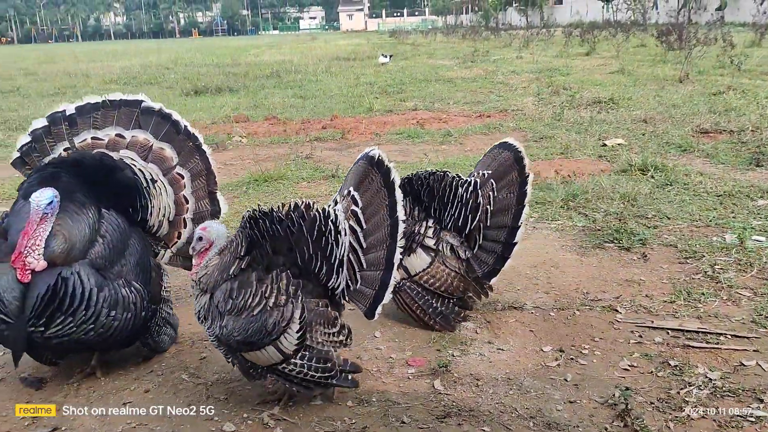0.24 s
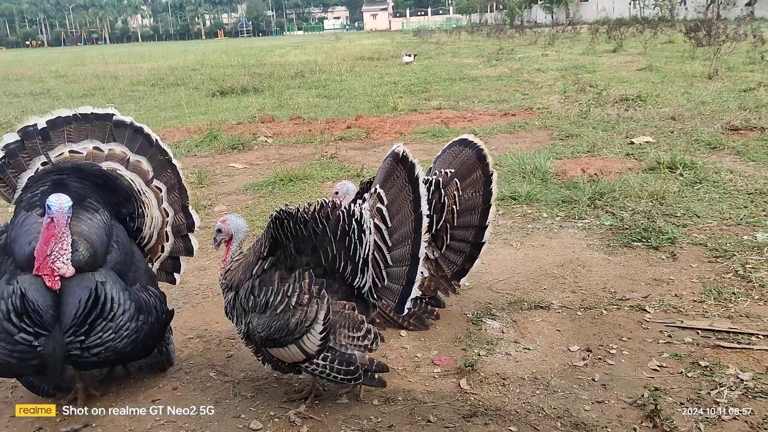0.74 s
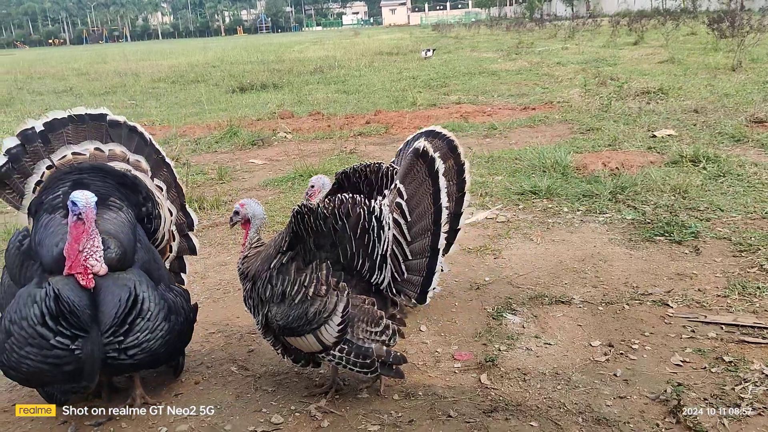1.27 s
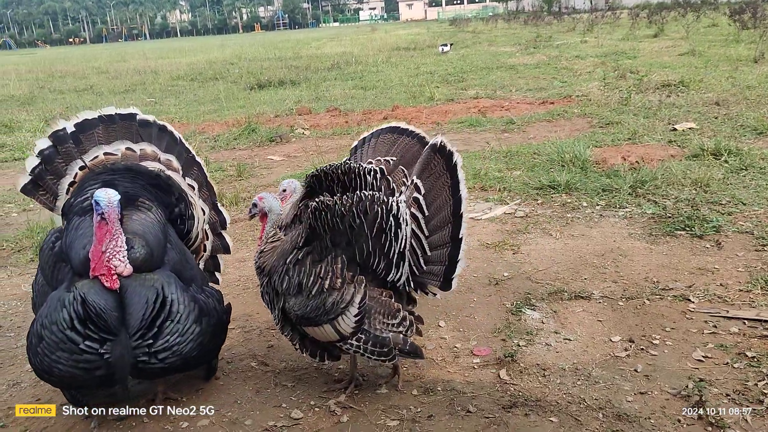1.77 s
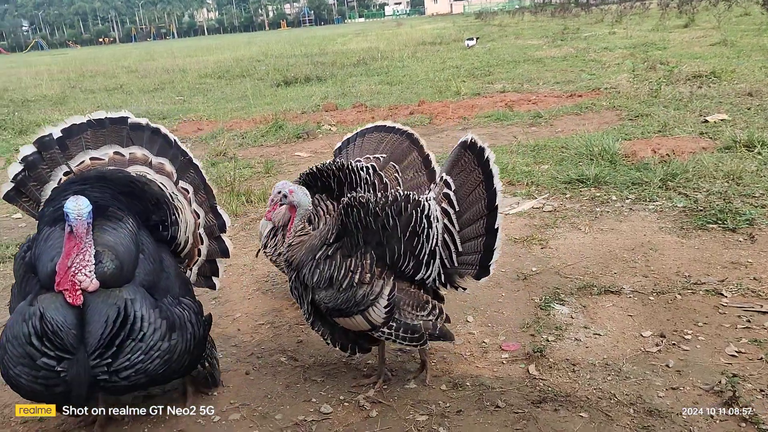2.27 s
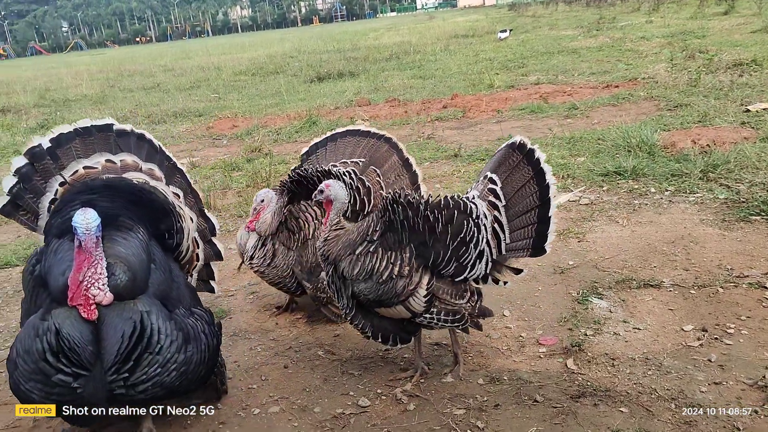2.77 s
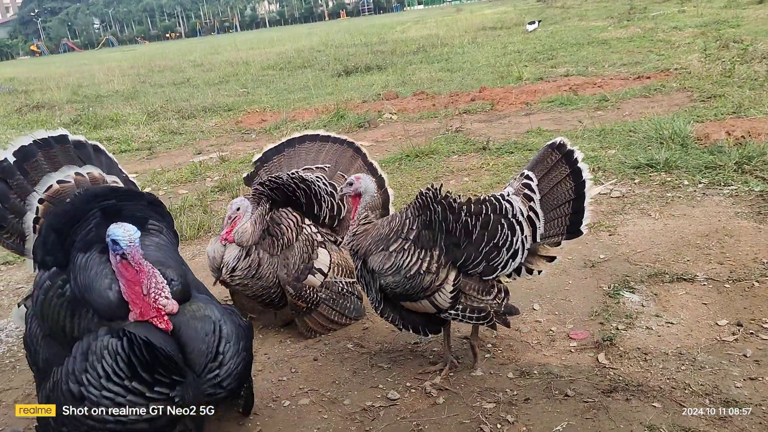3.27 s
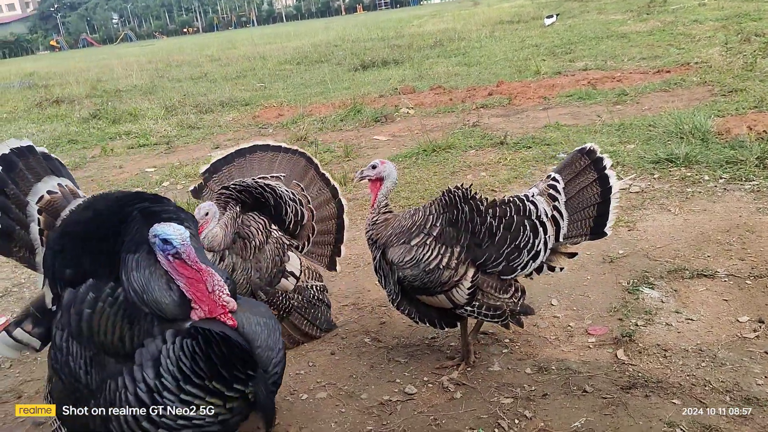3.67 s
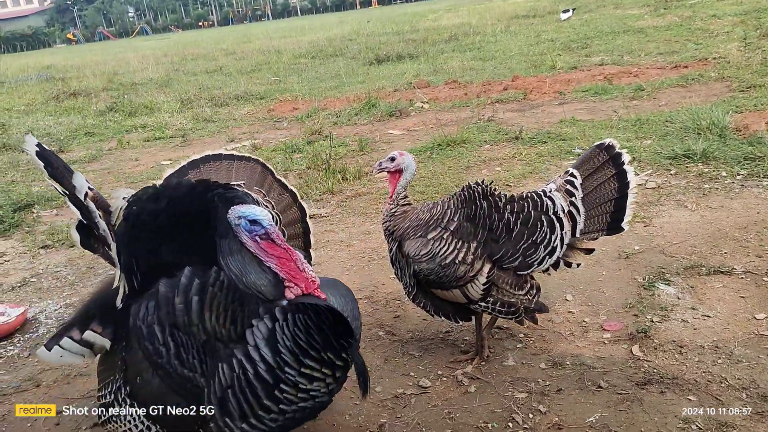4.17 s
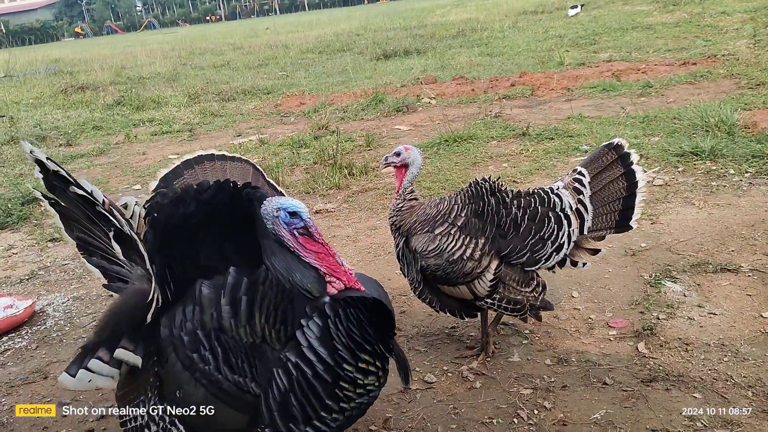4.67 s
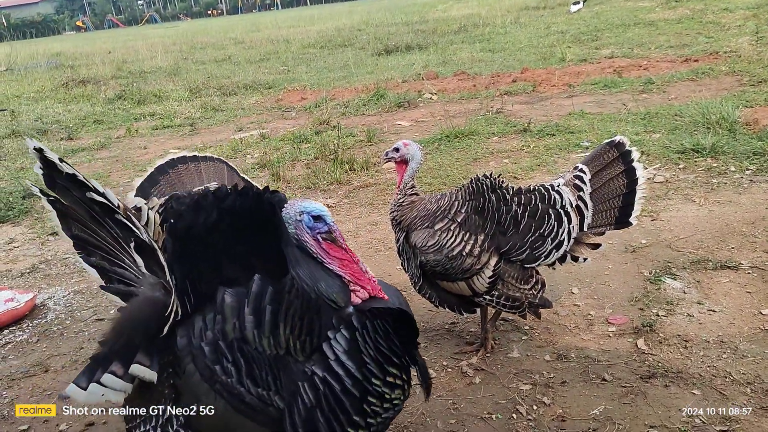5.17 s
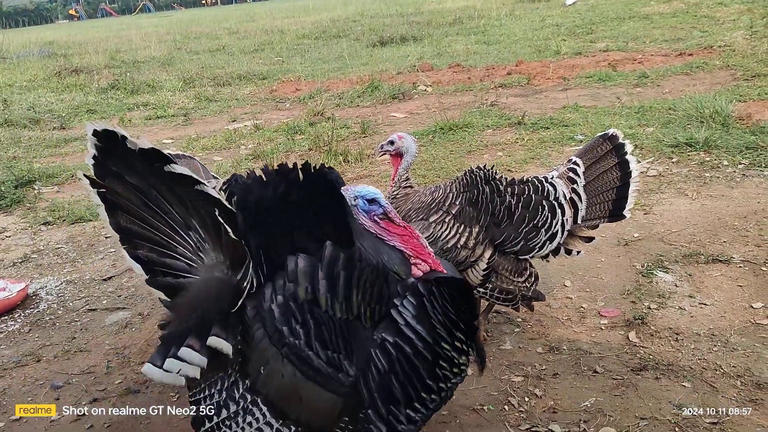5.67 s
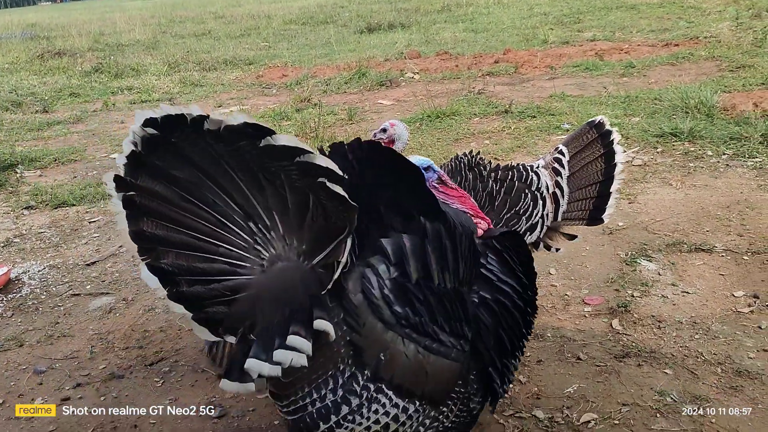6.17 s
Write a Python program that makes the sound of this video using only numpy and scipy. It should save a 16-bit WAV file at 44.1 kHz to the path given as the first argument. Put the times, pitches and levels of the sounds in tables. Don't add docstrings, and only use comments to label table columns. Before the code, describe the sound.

An open farmyard heard close in stereo: two low turkey drones around 40 hertz waver against each other throughout. A far bird trill and crunchy foot taps open it, then a hard, short puff of breath from a turkey, fainter puffs, and repeated bird chirps. Near the end comes another spit and two scratchy feather drags. Cricket pulses and quiet country air continue behind, with light echoes on the birdsong.

```python
import sys
import numpy as np
from scipy import signal
from scipy.fft import rfft, irfft
from scipy.io import wavfile
from scipy.ndimage import uniform_filter1d

SR = 44100
rng = np.random.default_rng(int(sys.argv[2]) if len(sys.argv) > 2 else 0)


def boost_factor(decibels):
    exponent = np.asarray(decibels, float) / 20
    return 10 ** exponent


def store_pcm(level_fs):
    pcm = np.round(np.clip(level_fs, -1, 1) * 32767).astype(np.int16)
    wavfile.write(sys.argv[1], SR, np.atleast_2d(pcm).T)


N = 283563
LEFT_LAG_S = 0.000352


def rms_one(x):
    return x / np.sqrt(np.mean(x ** 2) + 1e-20)


def in_time(rows):
    s, *columns = np.transpose(rows)
    return [np.interp(np.arange(N) / SR, s, c) for c in columns]


def gate(start_s, length_s, fade_s):
    t = np.arange(N) / SR - start_s
    return np.clip(np.minimum(t, length_s - t) / fade_s, 0, 1), np.clip(t / length_s, 0, 1)


def bell(s, half_s):
    return np.exp(-.5 * ((np.arange(N) / SR - s) / half_s) ** 2)


def at_hz(points, hz, beyond=None):
    point_hz, value = np.array(points).T
    return np.interp(np.log(hz + 1), np.log(point_hz), value, right=beyond)


def drift(rate):
    r = np.exp(-80 * np.pi * rate / SR)
    slow = signal.lfilter([1], [1, -2 * r, r * r], rng.standard_normal(N // 40 + 2002))[2000:]
    return np.interp(np.arange(N) / 40, np.arange(len(slow)), rms_one(slow))


def resonance(x, hz, width_hz):
    r = np.exp(-np.pi * width_hz / SR)
    feedback = [1, -2 * r * np.cos(2 * np.pi * hz / SR), r * r]
    return signal.lfilter([(1 - r * r) / 2, 0, (r * r - 1) / 2], feedback, x + 1e-18)


def tone(hz, partial=1):
    return np.sqrt(2) * np.sin(2 * np.pi * (partial * np.cumsum(hz) / SR + rng.random()))


def placed(x, pan_db, lag_s=0.):
    n = np.arange(N)
    return np.array([np.interp(n - lag_s * SR, n, x) * boost_factor(pan_db / 2), x * boost_factor(-pan_db / 2)])


def field_noise(spectrum, pan_db, patchy_db):
    # hz, likeness (0-1)
    likeness = [(30, 0.7), (90, .97), (200, 0.96), (300, 1), (500, 0.76), (1000, 0.58), (2000, 0.21),
                (5000, 0)]
    hz = np.arange(N // 2 + 1) * SR / N
    mid, side = rfft(rng.standard_normal((2, N))) * boost_factor(at_hz(spectrum, hz, beyond=-150))
    alike = np.clip(at_hz(likeness, hz), 0, 1)
    mid, side = mid * np.sqrt(1 + alike), side * np.sqrt(1 - alike)
    late = np.exp(-2j * np.pi * hz * LEFT_LAG_S)
    pair = rms_one(irfft([(mid + side) * late, mid - side], N))
    return pair * boost_factor([[pan_db / 2], [-pan_db / 2]]) * boost_factor(patchy_db * drift(9))


def drone(hz, effort_db, partials, swells, wobble_db):
    out = 0
    for order, db, share in partials:
        level = boost_factor(db + share * effort_db + wobble_db * drift(2.45))
        for swell_order, s, half_s, swell_db in swells:
            if swell_order == order:
                level = level + boost_factor(swell_db) * bell(s, half_s)
        out = out + tone(hz, order) * level
    return out


def drones():
    # time_s, pitch_hz, effort_db
    upper_course = [(0, 42.87, -38), (.5, 42.47, -34), (1.0, 41.85, -37), (1.5, 41.33, -25.5),
                    (1.9, 40.83, -39.5), (2.25, 40.35, -29), (2.9, 39.82, -40), (3.4, 39.98, -32.5),
                    (3.95, 39.35, -31.5), (4.25, 39.25, -33.5), (4.5, 39.2, -28.5), (4.9, 39.17, -38.5),
                    (5.2, 38.51, -31.5), (5.7, 39.04, -44), (6.43, 38.9, -35.5)]
    # order, level_db, effort_share
    upper_partials = [(1, -44.5, .1), (2, -35.5, 0.82), (3, -46.5, 0.93), (4, -50.5, 0.28), (5, -52, 0.23),
                      (6, -47, 0.25), (7, -60, .2), (8, -58.5, 0.18)]
    lower_partials = [(1, -48.5, .9), (2, -47.5, 0.14), (3, -53.5, .9), (4, -53, 1.5), (5, -48, 0.74),
                      (6, -50.5, 0.66), (7, -55.5, 1.6), (8, -60.5, 0.7)]
    # order, peak_s, half_length_s, added_level_db
    upper_swells = [(1, 0.53, 0.071, -38), (1, 1.1, 0.5, -40), (1, 4.1, 0.059, -42),
                    (1, 4.84, 0.089, -35.5), (1, 5.42, .22, -38), (1, 6.24, 0.23, -37.5),
                    (3, 1.215, 0.061, -40), (3, 1.77, 0.072, -35), (3, 2.19, 0.095, -40),
                    (3, 2.94, 0.14, -40), (3, 4.55, 0.23, -42), (5, 0.63, 0.12, -40.5),
                    (5, 1.93, 0.16, -40.5), (5, 2.72, 0.28, -42), (5, 3.99, 0.1, -41), (5, 6.3, 0.62, -54)]
    lower_swells = [(2, 0.67, 0.21, -30.5), (2, 1.059, 0.066, -30), (2, 2.56, 0.058, -34),
                    (2, 4.6, .15, -45), (2, 5.35, 0.12, -38), (5, 0.29, 0.06, -33.5),
                    (5, 0.55, 0.062, -35.5), (5, 1.7, .25, -41), (5, 3.7, 0.069, -42), (6, 0.092, .15, -41),
                    (6, 0.82, 0.36, -45), (6, 1.89, 0.077, -39.5)]
    # pitch_hz, level_db
    steady_hum = (47.2, -50)
    t = np.arange(N) / SR
    hz, effort_db = in_time(upper_course)
    upper = drone(hz, effort_db - effort_db.mean(), upper_partials, upper_swells, wobble_db=1.5)

    start_hz, rest_hz, settle_s, fade_db_per_s = 36.48, 38.2, 2.6, 1.5
    low_hz = rest_hz + (start_hz - rest_hz) * np.exp(-t / settle_s)
    low_effort_db = fade_db_per_s * (t.mean() - t)
    lower = drone(low_hz, low_effort_db, lower_partials, lower_swells, wobble_db=2.5)

    hum_hz, hum_db = steady_hum
    hum = boost_factor(hum_db) * tone(np.full(N, hum_hz))
    whine_db = -57 + 5 * bell(1.18, 0.4) + 3.5 * drift(25)
    whine_end = np.clip((3.07 - t) / .3, 0, 1)
    whine = tone(hz * 48.3 + 30 * drift(40)) * boost_factor(whine_db) * whine_end
    return placed(upper + lower + hum, -0.86, LEFT_LAG_S) + placed(whine, -6, 0.00034)


def puff_level(s, hold_s, db, sag_db, leak_db):
    attack_s, release_db_per_s, leak_s, leak_rise_db_per_s = .003, 1900, 0.051, 250
    t = np.arange(N) / SR - s
    burst_db = db - sag_db * np.clip(t / hold_s, 0, 1) - release_db_per_s * np.maximum(t - hold_s, 0)
    rise = np.clip(t / (attack_s * boost_factor(0.32 * (-23 - db))), 0, 1)
    leak = boost_factor(leak_db + leak_rise_db_per_s * np.minimum(t, 0)) * gate(s - leak_s, leak_s + hold_s, 0.023)[0]
    return boost_factor(burst_db) * rise + leak


def spits():
    # start_s, hold_s, level_db, sag_db over the hold, leak_db just before
    puffs = [
        (3.067, 0.034, -21.5, 13, -44),
        (3.398, 0.045, -33, 10.5, -51),
        (3.577, 0.1, -50, 8, -56.5),
        (5.679, 0.033, -26.5, 12, -35.5),
    ]
    # low_hz, main_hz, high_hz, low_db, high_db, hiss_db
    throats = [(1800, 2700, 4230, -5, 1.5, -25), (2570, 2840, 3610, -5, -11, -40),
               (2500, 3400, 3320, -13, 5, -29), (2040, 2870, 4160, -6.5, -6, -36)]
    chest_levels = [-51, -43, -35, -11.5]
    puff_pans = [-17, -17.5, -15, -13.5]
    out, voiced_cut = 0, signal.butter(6, 5700, fs=SR, output="sos")
    for row, throat, chest_db, pan_db in zip(puffs, throats, chest_levels, puff_pans):
        low_hz, main_hz, high_hz, low_db, high_db, hiss_db = throat
        air = rng.standard_normal(N) * boost_factor(1.5 * drift(200))
        bands = [(low_hz, 450, low_db), (main_hz, 420, 0), (high_hz, 800, high_db), (600, 600, chest_db)]
        voiced = 0
        for k, (hz, width_hz, db) in enumerate(bands):
            band = resonance(resonance(air, hz, width_hz), hz, 3 * width_hz)
            voiced = voiced + (-1) ** k * boost_factor(db) * band
        hiss = resonance(resonance(air, 5800, 4500), 6800, 8300) * boost_factor(hiss_db + 5.0)
        puff = rms_one(signal.sosfilt(voiced_cut, voiced) + hiss)
        out = out + placed(puff * puff_level(*row), pan_db, -0.000304)
    return out


def wing_drag():
    # start_s, length_s, quill_db, ground_db
    strokes = [
        (5.709, 0.338, -47.5, -53.5),
        (6.074, 0.296, -52, -56.5),
    ]
    quills = 0
    for hz in (2750, 3050, 3370, 3490, 4000):
        flecks = rng.standard_normal(N) * boost_factor(5.5 * drift(35))
        quills = quills + resonance(resonance(flecks, hz, 230), hz, 610)
    quills = rms_one(quills)
    ground = rms_one(resonance(resonance(rng.standard_normal(N), 700, 300), 460, 900))
    scrape = 0
    for s, length_s, quill_db, ground_db in strokes:
        stroke = quills * boost_factor(quill_db) + ground * boost_factor(ground_db)
        scrape = scrape + stroke * gate(s, length_s, 0.027)[0]
    return placed(scrape, -16.5, -0.00017)


def steps():
    # start_s, knock_hz, knock_db, snap_db, pan_db
    treads = [(.001, 1960, -34, -28.5, -6), (.026, 1510, -34.5, -74, -15), (.16, 4000, -60, -44, -9.5),
              (0.322, 4000, -35, -47, -14), (0.342, 2980, -32.5, -46, -16.5),
              (0.3407, 515, -21, -66, -20.5), (0.372, 1650, -36.5, -74, -12),
              (0.3703, 690, -38.5, -72, -26), (0.028, 850, -34, -70, -12), (.392, 4000, -41, -52, -12),
              (.695, 4000, -48, -47, -5), (1.357, 870, -41, -39.5, -18.5), (1.381, 4970, -42, -44, 2),
              (1.451, 720, -38.5, -64, -26), (1.4519, 1720, -30.5, -68, -17), (1.529, 1490, -53, -52, 8),
              (2.167, 2280, -34, -33.5, -21.5), (2.272, 5100, -82, -50, -11), (2.339, 1630, -28, -70, -7),
              (4.658, 1800, -36, -59, -14), (5.195, 3270, -30.5, -70, -10), (6.194, 4000, -38, -44, -5)]
    out, t = np.zeros((2, N)), np.arange(400) / SR
    grit_band = signal.butter(2, [8000, 15000], "band", fs=SR, output="sos")
    grit = signal.sosfilt(grit_band, rng.standard_normal((len(treads), 400)))
    snap_s = .0008
    for (s, hz, knock_db, snap_db, pan_db), crackle in zip(treads, grit):
        cycles = t * hz
        ring = 0.46 * (hz / 500) ** 0.46
        envelope = (cycles / ring * np.exp(1 - cycles / ring)) ** 1.5
        knock = np.sin(2 * np.pi * cycles) * envelope * boost_factor(knock_db + 1.5)
        hit = knock + crackle * np.exp(-t / snap_s) * boost_factor(snap_db)
        first = round(s * SR)
        out[:, first:first + 400] += hit * boost_factor([[pan_db / 2], [-pan_db / 2]])
    return out


def whistles():
    # start_s, length_s, start_hz, end_hz, level_db
    falls = [
        (3.112, .54, 5850, 4495, -58.5),
        (3.2, .63, 5950, 4420, -59.5),
    ]
    # start_s, length_s, start_hz, end_hz,
    # level_db
    short_notes = [(1.1, 0.14, 4690, 2870, -61), (1.41, .13, 4210, 2920, -69),
                   (3.778, 0.042, 3400, 3420, -37.5), (3.825, .02, 3200, 3000, -43.5),
                   (3.85, .03, 4300, 3200, -53), (3.88, 0.095, 4300, 4250, -63),
                   (4.305, 0.031, 3340, 3264, -40.5), (4.453, .04, 3180, 3232, -52),
                   (5.11, 0.093, 3930, 3680, -52.5), (5.45, 0.21, 3950, 3740, -59),
                   (5.775, 0.031, 2750, 3050, -49), (5.84, .04, 2950, 2990, -57),
                   (5.92, 0.059, 4150, 3750, -55), (5.975, 0.041, 3650, 3592, -51)]
    # length_share, fall_share, level_db
    fall_shape = [(0, 0.016, 1), (0.172, .22, -2), (0.449, .33, 0.5), (.72, .5, 2), (1, 1, 3)]
    song, (share, fall, shape_db) = 0, np.transpose(fall_shape)
    for rows, long in ((falls, True), (short_notes, False)):
        for s, length_s, start_hz, end_hz, db in rows:
            on, done = gate(s, length_s, 0.051 * length_s)
            fallen = uniform_filter1d(np.interp(done, share, fall), size=3000) if long else done
            level_db = db + long * np.interp(done, share, shape_db) + 3 * drift(40) + 2 * drift(8)
            waver_hz = (12 if long else 50) * drift(180)
            pitch = start_hz + (end_hz - start_hz) * fallen + waver_hz
            song = song + tone(pitch) * boost_factor(level_db) * on
    return song


def birds():
    # start_s, length_s, second_partial_top_hz, second_db, first_db
    calls = [
        (3.976, .13, 4390, -48, -49.5),
        (4.214, 0.13, 4400, -46, -49.5),
        (4.451, .12, 4290, -44, -49),
        (4.714, .13, 4100, -44.5, -55),
        (4.972, .135, 4216, -40, -55),
        (5.323, 0.12, 4210, -38.5, -65),
    ]
    # length_share, top_pitch_share, level_db
    arch = [(0, .68, -1.5), (0.171, 0.97, -8.5), (.4, .99, -2.5), (0.619, .91, -2.5), (.82, .82, -3),
            (1, .65, 0)]
    song, (share, pitch_share, shape_db) = whistles(), np.transpose(arch)
    for s, length_s, top_hz, db, first_db in calls:
        on, done = gate(s, length_s, 0.0057)
        shyness_db = max(-38 - db, 0)
        arched_hz = uniform_filter1d(top_hz * np.interp(done, share, pitch_share), size=400)
        pitch = arched_hz / 2 + (40 + 4 * shyness_db) * drift(120)
        second, third, fourth = (tone(pitch, k) * boost_factor((3 + .3 * shyness_db) * drift(70)) for k in (2, 3, 4))
        beak = resonance(resonance(third, 5200, 700), 5200, 900)
        voice = second + boost_factor(-10) * beak + boost_factor(db + 12) * fourth
        first = tone(pitch * 1.05) * boost_factor(first_db) * bell(s + 0.28 * length_s, 0.091 * length_s)
        dip_db = 0.3 * (first_db - db + 21.5) * bell(s + 0.49 * length_s, 0.11 * length_s)
        level_db = db + np.interp(done, share, shape_db) - dip_db
        song = song + (voice * boost_factor(level_db) + first) * on
    return song


def yard_echo(x):
    # delay_s, level_db
    returns = [
        (0.026, 0),
        (0.096, -7.5),
        (.155, -19),
        (0.248, -6),
    ]
    smear_s, t60_s = 0.015, 1
    t = np.arange(SR) / SR
    clusters = sum(boost_factor(db) * np.exp(-.5 * ((t - s) / smear_s) ** 2) for s, db in returns)
    tail = boost_factor(-10.5 - 60 * t / t60_s) * np.clip(t / 0.0091, 0, 1)
    response = rng.standard_normal((2, SR)) * (clusters + tail) * boost_factor(-27.5)
    return signal.fftconvolve(x[None], response, axes=1)[:, :N]


def far_trill():
    # start_s, length_s, level_db
    trill_notes = [
        (-.05, 0.33, -41),
        (.2, 0.092, -53),
        (.28, .21, -46.5),
    ]
    hz = 3570 + 12 * drift(30)
    pair = tone(hz) + boost_factor(-17) * tone(hz * 1.1)
    level = sum(boost_factor(db) * np.sqrt(gate(s, length_s, 0.93 * length_s)[0]) for s, length_s, db in trill_notes)
    return placed(pair * level * boost_factor(3.15 * drift(60)), -9.5, -0.000069)


def cricket():
    # middle_stroke_s, middle_db, last_stroke_db
    wing_chirps = [(-.028, -62, -51), (.52, -51, -46), (1.1947, -51, -49), (1.779, -48.5, -48),
                   (2.4029, -47.5, -49), (2.9736, -49.5, -58), (3.5336, -45, -63), (4.1033, -50, -49),
                   (4.7092, -50, -52), (5.2904, -49.5, -45), (5.849, -51, -50)]
    stroke_gap_s, strokes = .0335, 0
    for s, db, last_db in wing_chirps:
        for k, stroke_db in zip((-1, 0, 1), (db - 3.5, db, last_db)):
            strokes = strokes + boost_factor(stroke_db) * bell(s + k * stroke_gap_s + .002, .0023)
    wing = tone(6500 + 40 * drift(100))
    return placed(strokes * wing * 1.13, -1.0, .0001)


def rustle():
    # start_s, length_s, level_db
    shivers = [
        (-.1, 1.55, -84.5),
        (2.3, 1.7, -79),
        (5.48, 1.1, -77),
    ]
    # hz, level_db per Hz
    feather_spectrum = [(9500, -30), (10800, -2.5), (13400, 0), (14300, -12), (15500, -42)]
    level = sum(boost_factor(db) * gate(s, length_s, .06)[0] for s, length_s, db in shivers)
    return level * field_noise(feather_spectrum, -2, 1.5)


def country_air():
    # time_s, level_db
    breeze = [(0, -47), (.3, -51), (1.0, -51), (1.6, -48.5), (2.5, -51), (3.85, -49.5), (4.3, -51.5),
              (5.4, -52), (5.86, -48.5), (6.43, -49.5)]
    # hz, level_db per Hz
    rumble_spectrum = [(15, -10.5), (30, -2), (60, 3), (100, -7), (200, -6), (260, -12), (330, -40),
                       (500, -51)]
    yard_spectrum = [(160, -25.5), (280, -3), (460, -7), (550, -7.5), (640, -13.5), (880, -9.5),
                     (1200, -12), (1700, -16.5), (2300, -49), (3000, -67)]
    treble_spectrum = [(1200, -2), (1700, 0.5), (3000, 0.5), (4200, -5), (5000, -6.5), (5450, -10.5),
                       (5800, -36), (7000, -58.5)]
    top_spectrum = [(5000, -10), (5700, 7), (6600, 0.5), (7500, -5.5), (9300, -3), (9700, 1), (10000, 5),
                    (10400, -4), (10800, -11), (13000, -13), (15000, -30)]
    patchy = {"rumble": 1.5, "yard": .6, "treble": .5, "top": .4}
    breeze_db, = in_time(breeze)
    rumble_db = -37 - 0.3 * np.arange(N) / SR
    return (boost_factor(rumble_db) * field_noise(rumble_spectrum, -2.0, patchy["rumble"])
            + boost_factor(breeze_db + 3.0) * field_noise(yard_spectrum, -0.26, patchy["yard"])
            + boost_factor(breeze_db + 0.5) * field_noise(treble_spectrum, -5.5, patchy["treble"])
            + boost_factor(-68.5) * field_noise(top_spectrum, -1.1, patchy["top"]))


def scene():
    song = birds()
    near_bird = placed(song, -12.5, -0.0002) + boost_factor(-7.0) * yard_echo(song)
    yard_sounds = drones() + spits() + wing_drag() + steps()
    return yard_sounds + near_bird + far_trill() + cricket() + rustle() + country_air()


def top_cut(x):
    return signal.sosfilt(signal.butter(12, 15000, fs=SR, output="sos"), x)


def record(dry):
    return top_cut(dry)


dry = scene()
out = record(dry)
store_pcm(out)
```